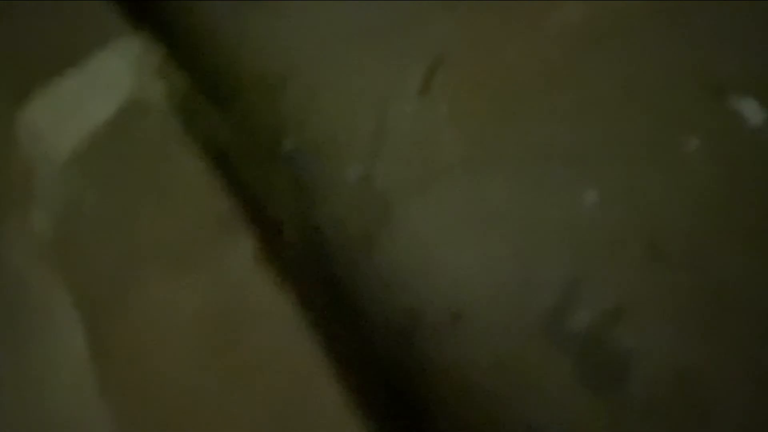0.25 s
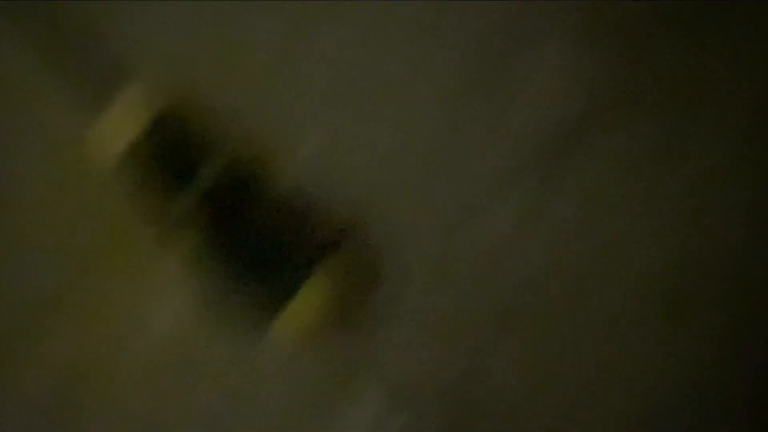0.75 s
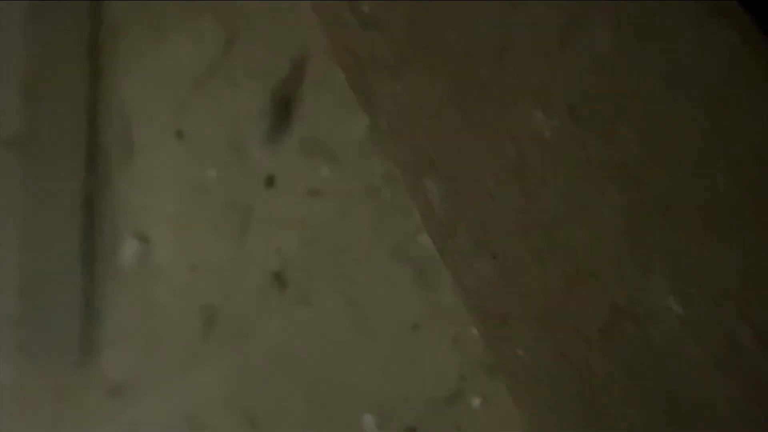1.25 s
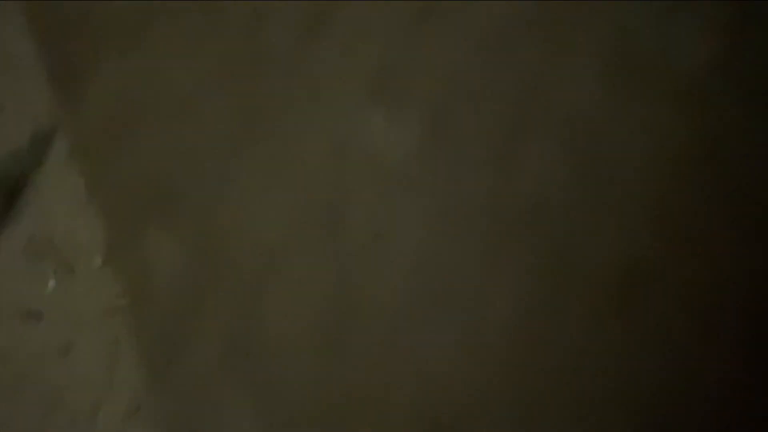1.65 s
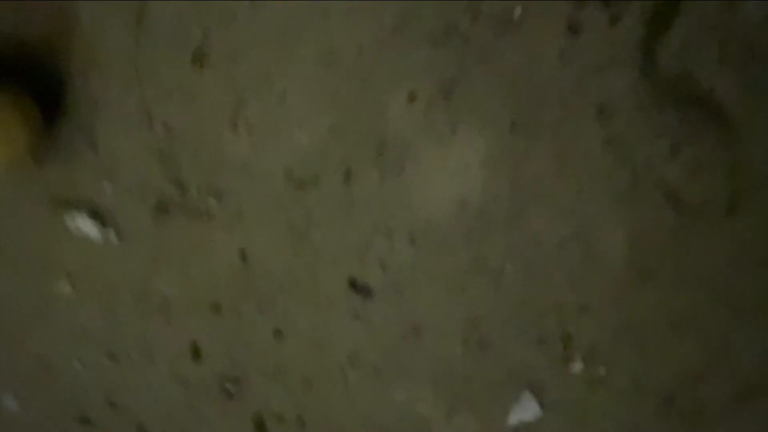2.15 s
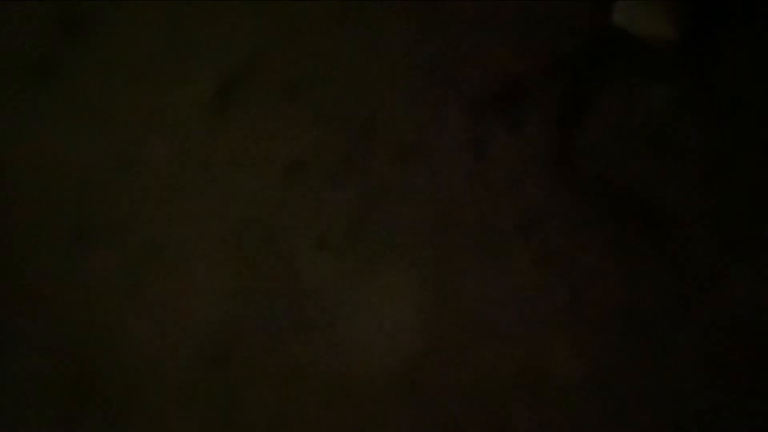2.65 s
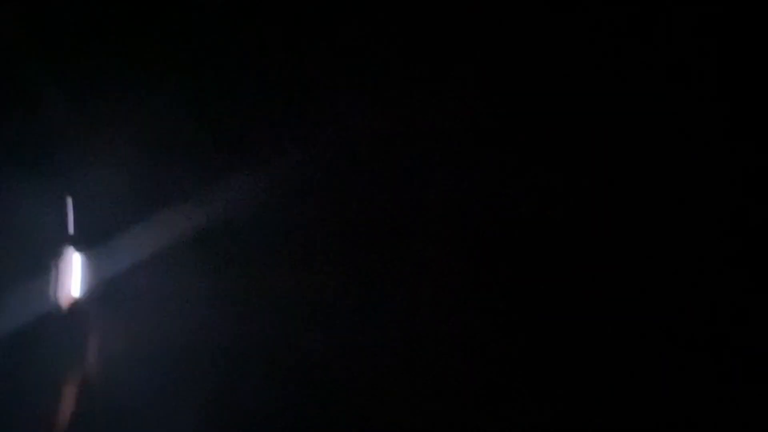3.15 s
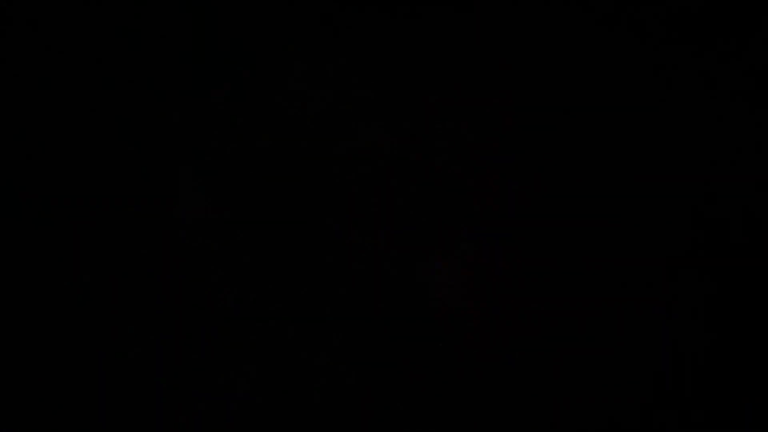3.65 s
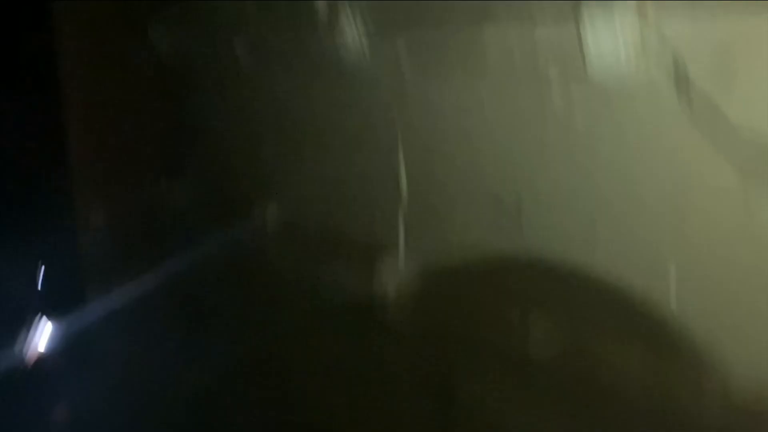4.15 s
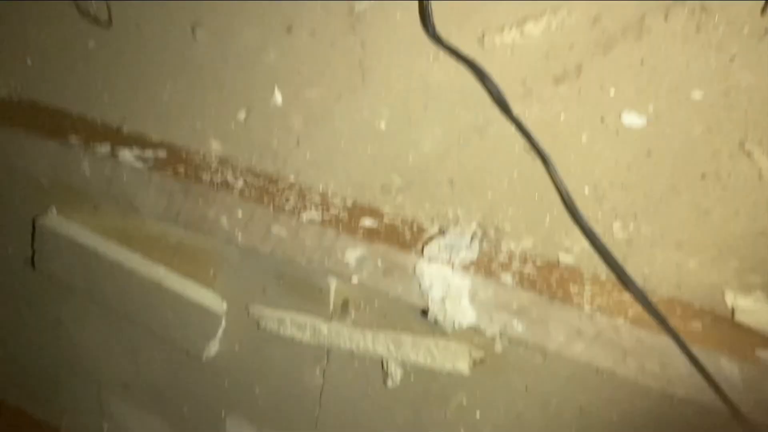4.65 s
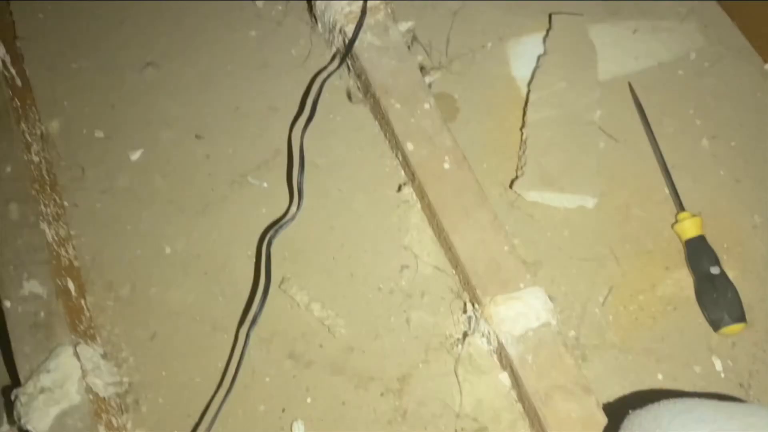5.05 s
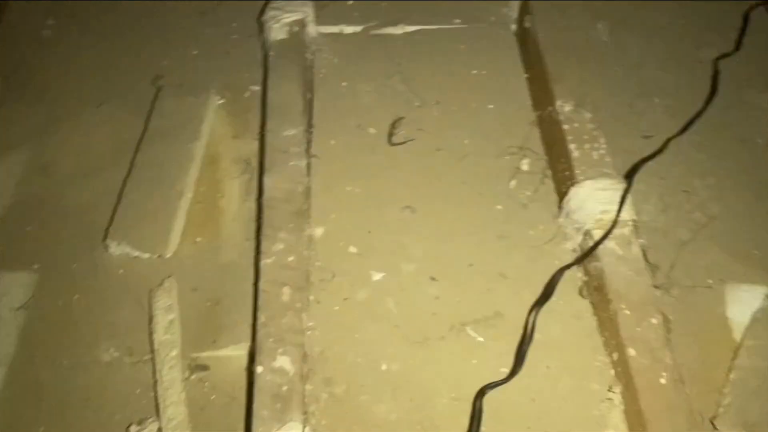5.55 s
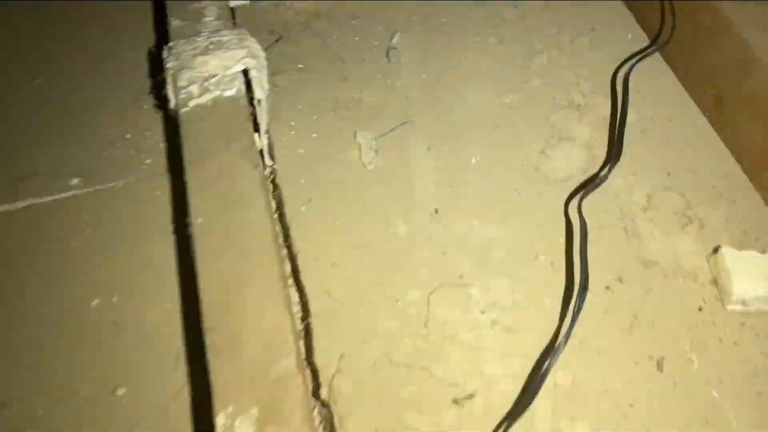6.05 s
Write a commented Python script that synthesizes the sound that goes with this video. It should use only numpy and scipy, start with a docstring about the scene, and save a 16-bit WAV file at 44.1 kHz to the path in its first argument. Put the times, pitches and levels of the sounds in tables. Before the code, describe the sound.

Close handling sound in a dry, enclosed roof space with only a very short room answer. Faint rumble and friction open it; a hollow knock lands at 0.3 s, left. At 0.7 s a heavy low double thud hits with a bright gritty crack. Scuffs follow, then boxy case knocks with woody thuds at 1.5 and 1.7 s, weaker taps between, and a loud cluster of knocks and thumps at 2.05-2.15 s. Low rumble swells around 2.3 s; a dull deep thump comes at 2.85 s. A low, short scrape drags at 3.15 s, then near quiet until about 4.3 s, with soft rustle. From 4.55 to 5.1 s come quick dry clicks, light bumps, scuffs and cloth hiss, the sharpest at 4.8 s. A click at 5.4 s sits right; after a lull, a moderate knock at 6.0 s and a soft scrape end it.

```python
"""A low, dry roof space: someone clambers over the ceiling joists with a camera in hand.
Blows are damped modes: thuds in the timber and knocks in the camera's case, mostly loudest at the left port.
Grit and gear click as damped modes under noise bursts; soles and clothes slide as unevenly gated noise.
Low noise rumbles with handling and shifting weight; short resonant scrapes and a faint hum lie beneath."""
import sys
import numpy as np
from scipy import signal
from scipy.fft import rfft, irfft, next_fast_len
from scipy.io import wavfile
from scipy.ndimage import map_coordinates

SR = 44100
rng = np.random.default_rng(int(sys.argv[2]) if len(sys.argv) > 2 else 0)


def transcribe(u):
    """Save the signal u as a 16-bit wav file named by the first command-line argument.

    u: samples, shape (n,) or (channels, n), limited to [-1, 1]; the rate is SR.
    q: integer samples, one column per channel.
    """
    v = np.clip(np.atleast_2d(u).T, -1, 1)
    q = np.round(v * 32767).astype(np.int16)
    wavfile.write(sys.argv[1], SR, q)


N = 277300
AGE = np.arange(SR // 3) / SR  # s since the start of a short sound
SLOW_T = np.arange(0, N / SR, .001)  # s, grid for slow envelopes

# Blows on the joists, levels before each layer's trim. Each row: time in seconds, thud level in dB,
# thud pitch in Hz, thud t60 in seconds, knock level in dB, knock pitch in Hz, crack level in dB,
# crack t60 in seconds, knock left over right in dB.
BLOWS = [(0.2856, -17, 268, 0.047, -21.5, 567, -35, .02, 10.5),
         (.298, -37.5, 279.3, .14, -49, 540, -58, .016, 14),
         (.7038, -8.5, 109.5, 0.067, -24, 728, -15, .0067, 2),
         (0.7313, -7.5, 97.2, 0.059, -28, 412, -25, .049, 6),
         (0.7384, -18.5, 134, 0.014, -23.5, 803, -27.5, .07, 3),
         (0.8741, -37.5, 237, 0.018, -31, 536, -42.5, 0.008, 13),
         (0.9873, -51.5, 309, 0.084, -35.5, 394, -46.5, .017, 9),
         (1.457, -25, 241, 0.038, -44.5, 607, -59, 0.017, 6),
         (1.516, -14.5, 305, 0.042, -9, 675, -23, .022, 7.5),
         (1.536, -20.5, 170, 0.044, -28, 510, -49.5, .016, 2.5),
         (1.5887, -30.5, 163, .025, -32, 560, -45, .018, 7),
         (1.6603, -35, 266, 0.02, -33.5, 482, -48, 0.017, 6),
         (1.706, -22, 203, 0.098, -9.5, 649, -26.5, .0084, 9.5),
         (1.731, -36, 220, 0.06, -33, 564, -51, .014, 8.5),
         (1.8654, -46, 242, .019, -39.5, 447, -38.5, .023, 1),
         (1.872, -28, 240.4, 0.025, -35.5, 457, -35.5, .027, 12),
         (2.0545, -21.5, 209, 0.0065, -15, 644, -11, .021, 11),
         (2.0953, -13, 125, 0.08, -10, 703, -19, .078, 5),
         (2.1051, -28.5, 132, .021, -14, 487, -18, .041, -2),
         (2.142, -9, 144.8, 0.02, -20, 598, -31.5, .015, 5),
         (2.8496, -15, 116, 0.022, -48.5, 550, -54, .016, 4),
         (2.868, -28, 66.8, .07, -68, 474, -63, .016, 0), (4.32, -44, 94.5, 0.16, -70, 450, -69, .016, 6),
         (4.398, -51, 198, 0.018, -57.5, 450, -58, .016, 2),
         (4.5577, -27, 123, 0.021, -40.5, 517, -34.5, 0.007, 6),
         (4.635, -45, 166, 0.1, -59, 450, -62, .016, 1),
         (4.858, -38.5, 86.05, 0.062, -68, 612, -50, .023, 6),
         (4.906, -37, 203, 0.011, -47, 664, -39, .016, 4.5),
         (5.096, -49, 84.6, 0.037, -72.5, 600, -60.5, .016, 5),
         (5.699, -52, 244.5, 0.073, -77.5, 448, -57.5, .018, 16),
         (6.004, -37, 90, 0.086, -40, 524, -36, .025, -1),
         (6.013, -24.5, 254.7, .021, -31.5, 650, -34, .023, 5)]
# Spectrum of gritty contact. Each row: frequency in Hz, relative density in dB.
CRACK_SPECTRUM = [(300, -25), (900, 6.5), (1500, 0), (2200, -4.5), (3200, -9.5), (5000, -12.5), (7000, -27),
                  (9000, -46.5)]


def blows():
    """Each blow: a gritty crack, a short knock in the case, a dull thud that leaves the boards ringing."""
    # Modes of the case. Each row: ratio to the knock pitch, relative level in dB, t60 in seconds.
    case_modes = [(.78, -6, 0.022), (1.0, 2.5, 0.02), (1.22, -9.5, 0.018), (1.75, -16.5, 0.013)]
    # Modes of the ceiling boards. Each row: pitch in Hz, mean relative level in dB, t60 in seconds.
    board_modes = [(71.6, -16.5, .2), (114, -10, .2), (166, 1, 0.047), (222, -2.5, .09), (276.6, 2.5, 0.04),
                   (380, -2.5, 0.037)]
    thud_rise_s, knock_rise_s, crack_rise_s = .003, .0013, .0016
    thud_trim_db, knock_trim_db, crack_trim_db = 0, -1.0, -9
    boards_from_thud_db, boards_from_knock_db, boards_spread_db = -28.5, -19.5, 4.4
    grind_db, grind_rise_s, grind_t60_s = -29, .015, .083
    touch_db, touch_lead_s, touch_t60_s = -17, .0022, .0064
    lead_s = .0012  # thud and crack begin ahead of the knock
    phase_spread, port_phase_spread = .7, .36  # rad

    out = np.zeros((2, N))
    for s, thud_db, thud_hz, thud_t60, knock_db, knock_hz, crack_db, crack_t60, pan_db in BLOWS:
        boards = 0
        for hz, db, t60 in board_modes:
            gain = amp(db + rng.normal(0, boards_spread_db))
            boards = boards + gain * ring(hz, .0054, t60, rng.uniform(0, 2 * np.pi))
        # the boards ring in step with the force of the blow
        force = amp(thud_db + boards_from_thud_db) + amp(knock_db + boards_from_knock_db)
        thud = amp(thud_db + thud_trim_db) * ring(thud_hz, thud_rise_s, thud_t60, np.pi)
        add(out, s - lead_s, panned(thud + force * boards, .15 * pan_db))

        # each mode of the case reaches the two ports with a different phase
        case = 0
        for ratio, db, t60 in case_modes:
            hz = knock_hz * ratio * (1 + rng.normal(0, .011))
            phase = rng.normal(0, phase_spread) + rng.normal(0, port_phase_spread, (2, 1))
            case = case + amp(db) * ring(hz, knock_rise_s, t60, phase)
        add(out, s, panned(amp(knock_db + knock_trim_db) * case, pan_db))

        # the edge touches first
        touch = amp(knock_db + touch_db) * ring(.88 * knock_hz, knock_rise_s, touch_t60_s)
        add(out, s - touch_lead_s, touch)

        # dust keeps grinding while the weight settles
        grit = strike(crack_rise_s, crack_t60) + amp(grind_db) * strike(grind_rise_s, grind_t60_s)
        crack = amp(crack_db + crack_trim_db) * grit * noise(CRACK_SPECTRUM, len(AGE))
        add(out, s - lead_s, panned(crack, .3 * pan_db))
    return out


def clicks():
    """Grit and gear tick: a light touch, then a pair of heavily damped modes under a bright snap."""
    # Small hard contacts, levels before trim. Each row: time in seconds, body level in dB,
    # body pitch in Hz, body t60 in seconds, snap level in dB, body left over right in dB.
    contacts = [(.2855, -23.5, 823, 0.033, -60.5, 15), (0.7026, -12.5, 1605, 0.013, -26, 0),
                (.874, -44, 1100, 0.011, -52, 10), (1.7056, -19, 1166, 0.03, -47, 8),
                (1.8648, -44, 4680, 0.016, -37.5, -2), (2.052, -30.5, 1047, 0.012, -44, 6),
                (2.1444, -21.5, 990, .0092, -36, 1.5), (4.5991, -20, 1070, 0.0058, -32.5, 3.5),
                (4.769, -22, 1810, 0.0043, -36.5, 1), (4.8116, -22, 1147, 0.018, -18.5, 3),
                (4.9057, -34.5, 2020, 0.011, -33, 0), (4.9725, -71, 1192, .012, -39.5, 0),
                (5.0041, -37, 2200, 0.0089, -37, -2), (5.054, -23.5, 2030, 0.0032, -32, -0.5),
                (5.0919, -36, 2130, .011, -37.5, 0), (5.394, -40, 1970, .007, -42.5, -1),
                (5.4363, -23.5, 896, .011, -25, -7), (5.4362, -29.5, 1624, 0.0092, -43, -7),
                (5.782, -47.5, 1190, .016, -38, 1), (5.9997, -36.5, 800, 0.024, -46.5, 3),
                (6.043, -65, 1680, .012, -38.5, 0)]
    # Snap spectrum. Each row: frequency in Hz, relative density in dB.
    snap_spectrum = [(150, -29.5), (700, 4), (2500, -0.5), (4800, -0.5), (6500, -11.5), (8000, -23),
                     (9300, -32.5)]
    body_trim_db, upper_db, snap_trim_db, touch_db = -4, -9, -8, -17
    rise_s, snap_t60_s, lead_s, touch_lead_s = .00067, .013, .00054, .003

    out = np.zeros((2, N))
    for s, body_db, hz, t60, snap_db, pan_db in contacts:
        lower = ring(hz, rise_s, t60, rng.normal(0, .42, (2, 1)))
        upper = ring(1.5 * hz, rise_s, .79 * t60, rng.normal(0, .14, (2, 1)))
        body = amp(body_db + body_trim_db) * (lower + amp(upper_db) * upper)
        snap_gain = amp(snap_db + snap_trim_db)
        snap = snap_gain * strike(rise_s, snap_t60_s) * noise(snap_spectrum, len(AGE))
        add(out, s - lead_s, panned(body, pan_db) + panned(snap, .4 * pan_db))
        touch = strike(.0028, .015) * noise(CRACK_SPECTRUM, len(AGE))
        add(out, s - touch_lead_s, snap_gain * amp(touch_db) * touch)
    return out


def loft(x):
    """The faint, short answer of the roof space: noise decaying at a rate set by frequency."""
    # Decay of the space. Each row: frequency in Hz, t60 in seconds.
    decay = [(100, 0.079), (300, 0.42), (700, 0.11), (8000, .07)]
    hz, t, bins = signal.stft(rng.standard_normal((2, SR // 3)), SR, nperseg=256)
    decayed = bins * amp(-60 * t / along(decay, hz)[:, None])
    tail = signal.istft(decayed, SR, nperseg=256)[1]
    tail = tail.mean(0) + .12 * tail  # the ports lie close together
    return signal.fftconvolve(x, tail / np.linalg.norm(tail[0]), axes=1)[:, :N]


def sliding(scuff, cloth):
    """Soles scuff and cloth hisses; both catch and slip unevenly."""
    # Sole spectrum. Each row: frequency in Hz, relative density in dB.
    scuff_spectrum = [(120, -31.5), (260, -1), (450, -1), (650, -1.5), (860, -2.5), (1100, -6.5),
                      (1500, -5), (2000, -12), (3000, -16), (6000, -51)]
    # Cloth spectrum. Each row: frequency in Hz, relative density in dB.
    cloth_spectrum = [(600, -29), (1600, -5), (2400, -0.5), (3300, -2), (4200, -1.5), (5300, -3.5),
                      (6300, -9.5), (7300, -19), (8500, -35.5), (9300, -45)]
    catch_db, grain_db = .12, -.5  # depths of the slow and fast unevenness
    friction = unit(amp(catch_db * wobble(43) + grain_db * wobble(500)))
    soles = scuff * noise(scuff_spectrum, N)
    clothes = cloth * noise(cloth_spectrum, N)
    return friction * (soles + clothes)


def moves():
    """Strength of the sole scuff and of the cloth hiss; overlapping slides add in power."""
    # One slide per move of a limb. Each row: start in seconds, length in seconds,
    # sole scuff level in dB, cloth hiss level in dB.
    slides = [(0, 0.059, -71, -72), (.16, 0.11, -71.5, -74.5), (0.257, 0.17, -65, -68),
              (0.447, 0.061, -69, -74), (0.538, 0.12, -59, -66), (0.622, 0.15, -56.5, -61.5),
              (0.755, 0.15, -63, -63.5), (0.93, 0.31, -61.5, -65), (1.199, 0.069, -66.5, -63.5),
              (1.414, 0.2, -64, -66), (1.479, 0.057, -52.5, -61.5), (1.667, 0.062, -49.5, -58.5),
              (1.8, 0.232, -66, -65), (2.082, 0.082, -50.5, -61), (2.184, 0.18, -68, -65.5),
              (2.292, 0.013, -58.5, -69), (2.377, .12, -70.5, -73), (2.518, 0.11, -59, -62),
              (2.668, .2, -68.5, -73), (2.812, 0.047, -65, -74), (3.093, 0.042, -71, -69.5),
              (3.147, 0.049, -52.5, -62), (3.214, 0.21, -62.5, -65), (3.438, 0.068, -77.5, -73.5),
              (3.827, 0.19, -70, -67.5), (4.04, 0.073, -76, -77.5), (4.175, 0.67, -70, -68),
              (4.591, .05, -55, -62.5), (4.658, .08, -69, -72), (4.768, 0.061, -52, -54),
              (4.833, 0.091, -61.5, -58.5), (4.979, 0.13, -65, -60.5), (5.17, 0.16, -76, -74),
              (5.339, 0.31, -70, -74), (5.43, 0.026, -58.5, -62), (5.796, 0.028, -60.5, -65.5),
              (5.936, 0.073, -65.5, -73.5), (5.997, 0.11, -63, -69)]
    resting_scuff_db, resting_cloth_db = -73.5, -77.5  # friction that remains between moves
    power = amp([[resting_scuff_db], [resting_cloth_db]]) ** 2
    for s, length, scuff_db, cloth_db in slides:
        power = power + (amp([[scuff_db], [cloth_db]]) * stroke(s, length)) ** 2
    return [smooth(level) for level in np.sqrt(power)]


def stroke(s, length):
    """One slide grips, slows, then lets go: attack, sagging hold, release, fringed by light brushing."""
    sag_db_per_s, fringe_db, fringe_s = 9.5, -12, .04
    ease = .13 * length  # s, longer slides start and stop more gently
    attack, release = .011 + ease, .022 + ease
    t = SLOW_T - s
    age = np.maximum(t + attack, 0)
    after = np.maximum(t - length + ease, 0)
    gripped = (1 - np.exp(-(age / attack) ** 2)) * np.exp(-after / release)
    brushed = amp(fringe_db) * np.exp(-(np.maximum(-t, 0) + after) / fringe_s)
    return amp(-sag_db_per_s * age) * np.maximum(gripped, brushed)


def scrapes():
    """Each short slide swells and fades in one broad resonance."""
    # Short scrapes. Each row: middle in seconds, length scale in seconds, peak rms level in dB,
    # resonance in Hz.
    scrape_rows = [(0.651, 0.056, -59, 3500), (0.654, 0.086, -58.5, 1430), (1.672, 0.024, -54.5, 3470),
                   (2.561, 0.059, -59, 3110), (3.175, 0.07, -50, 251.5), (3.168, 0.024, -58, 1590),
                   (4.637, 0.044, -63.5, 4810), (4.854, 0.072, -63.5, 5800), (5.019, 0.012, -54, 5230),
                   (5.074, 0.027, -62.5, 2020), (5.167, 0.016, -58.5, 4700), (5.477, 0.017, -62, 5130),
                   (6.12, 0.056, -59.5, 313)]
    # Shape of the resonance. Each row: ratio to its frequency, relative density in dB.
    scrape_shape = [(.3, -42), (.7, -1.5), (0.9, -1), (0.998, 8.5), (1.1, -4.5), (1.351, -7.5), (2.2, -54)]
    out = np.zeros((2, N))
    for s, length, db, hz in scrape_rows:
        swell = np.exp(-2 * (AGE / length - 1.5) ** 2)
        spectrum = [(hz * ratio, gain_db) for ratio, gain_db in scrape_shape]
        add(out, s - 1.5 * length, amp(db) * swell * noise(spectrum, len(AGE)))
    return out


def rumble(scuff):
    """Shifting weight makes a low rumble that swells as a sole drags and after each thud."""
    # How hard the body shifts its weight. Each row: time in seconds, rumble level before trim in dB.
    effort_rows = [(0, -62), (.5, -60), (.64, -50.5), (1.2, -58.5), (1.37, -66.5), (1.62, -58.5),
                   (2.28, -51), (2.43, -60), (2.6, -55.5), (2.9, -57.5), (3.02, -62.5), (3.33, -56.5),
                   (3.7, -69), (4.25, -63.5), (4.7, -56), (5.2, -68), (5.64, -69), (6.29, -60.5)]
    # Rumble spectrum. Each row: frequency in Hz, relative density in dB.
    rumble_spectrum = [(15, -10), (35, -4), (60, -2.5), (90, -1), (120, -3), (165, -10.5), (240, -11.5),
                       (330, -22), (500, -31.5), (1000, -61)]
    trim_db = 1
    shudder_db, shudder_t60_s = -39.5, .45  # the joists shudder on: level from the thud, decay
    effort_db, = curves(effort_rows)
    shudder_power = 0
    for s, thud_db, *_ in BLOWS:
        decay_db = -60 * np.abs(SLOW_T - s) / shudder_t60_s
        shudder_power = shudder_power + (SLOW_T > s) * amp(thud_db + shudder_db + decay_db) ** 2
    power = amp(effort_db + trim_db) ** 2 + scuff ** 2 + smooth(shudder_power)
    return np.sqrt(power) * noise(rumble_spectrum, N)


def hum():
    """A faint hum from the house below: sine with a randomly wandering phase."""
    # Hum. Each row: frequency in Hz, rms level in dB.
    hum_tones = [(102.3, -72.5)]
    waver_rad = .7
    t = np.arange(N) / SR
    out = 0
    for hz, db in hum_tones:
        phase = 2 * np.pi * hz * t + waver_rad * wobble(2.5)
        out = out + amp(db) * np.sqrt(2) * np.sin(phase)
    return out


def amp(db):
    """Amplitude of a level in dB."""
    return 10 ** (np.asarray(db) / 20)


def unit(x):
    """Scaled to an rms of 1."""
    return x / np.sqrt(np.mean(x ** 2) + 1e-20)


def crest(x):
    """Scaled to a peak of 1."""
    return x / np.abs(x).max()


def along(points, hz):
    """Interpolate (Hz, value) points on a log axis."""
    f, v = np.transpose(points)
    return np.interp(np.log(hz + 1), np.log(f + 1), v)


def curves(rows):
    """One value per sample for each column after the time."""
    s, *cols = np.transpose(rows)
    return [np.interp(np.arange(N) / SR, s, c) for c in cols]


def smooth(envelope):
    """An envelope on the millisecond grid, one value per sample."""
    return np.interp(np.arange(N) / SR, SLOW_T, envelope)


def wobble(rate):
    """A smooth random curve, rate knots a second."""
    knots = rng.standard_normal(int(N * rate / SR) + 4)
    return map_coordinates(knots, [np.arange(N) * rate / SR])


def noise(spectrum, size):
    """Coloured stereo noise of rms 1, partly alike at the two ports."""
    # Likeness of the ports. Each row: frequency in Hz, left-right correlation.
    likeness = [(60, 0.93), (160, 1), (440, 0.34), (1190, 0.89), (3210, 0.8), (8680, 0.62)]
    length = next_fast_len(size, True)
    hz = np.fft.rfftfreq(length, 1 / SR)
    turn = np.arccos(np.clip(along(likeness, hz), -1, 1)) / 2
    white = rfft(rng.standard_normal((2, length)))
    coloured = white * amp(along(spectrum, hz)) * [np.cos(turn), np.sin(turn)]
    mid, side = irfft(coloured, length)[:, :size]
    return unit(np.array([mid + side, mid - side]))


def strike(rise, t60):
    """An envelope of peak 1: contact builds up, then the motion dies."""
    return crest((1 - np.exp(-(AGE / rise) ** 2)) * amp(-60 * AGE / t60))


def ring(hz, rise, t60, phase=0):
    """One damped mode."""
    return strike(rise, t60) * np.sin(2 * np.pi * hz * AGE + phase)


def panned(x, db):
    """Left louder than right by db, the mean of both gains kept at 1."""
    gains = amp([[db / 2], [-db / 2]])
    return x * gains / gains.mean()


def add(track, s, sound):
    """Mix a sound in at time s."""
    start = round(s * SR)
    track[:, start:start + len(AGE)] += sound[..., :N - start]


def scene():
    """Blows and clicks with their room answer, over friction, scrapes, rumble and hum."""
    room_db = -25
    hits = blows() + clicks()
    scuff, cloth = moves()
    near = hits + amp(room_db) * loft(hits)
    return near + sliding(scuff, cloth) + scrapes() + rumble(scuff) + hum()


def record(dry):
    """The deepest bass is thinned; the sound is band-limited, with nothing above about 9.4 kHz."""
    low_hz, top_hz, offset = 32, 9400, .0014
    size = next_fast_len(N + SR // 2)
    hz = np.fft.rfftfreq(size, 1 / SR)
    bass = 1j * hz / (low_hz + 1j * hz)
    treble = 1 / (1 + (hz / top_hz) ** 60)
    sound = irfft(rfft(dry, size) * bass * treble, size)[:, :N]
    return sound + offset  # the converter sits slightly off zero


dry = scene()
out = record(dry)
transcribe(out)
```